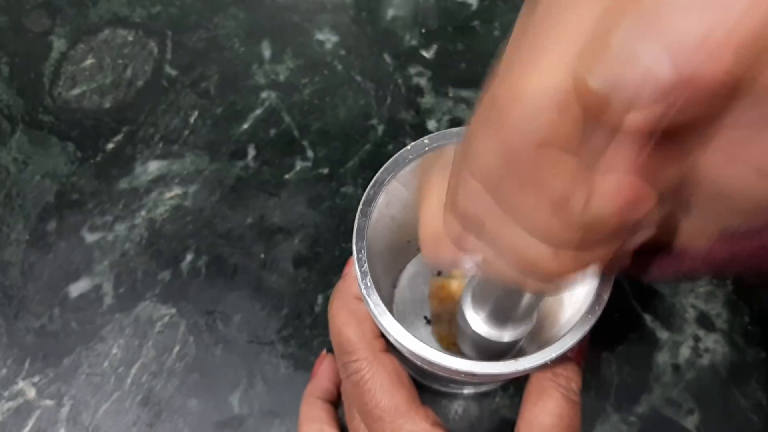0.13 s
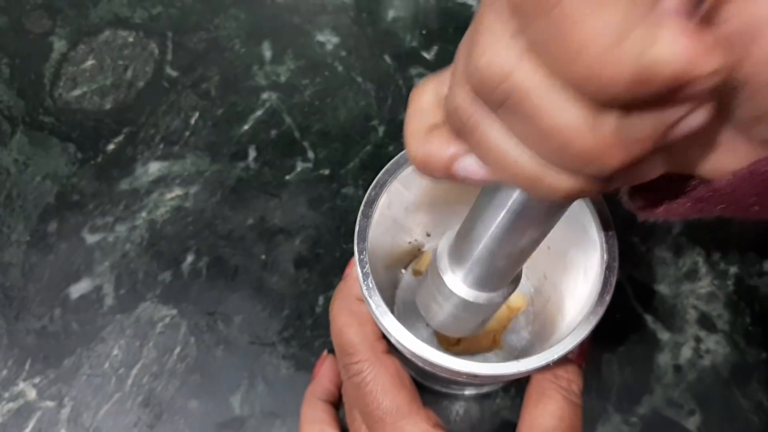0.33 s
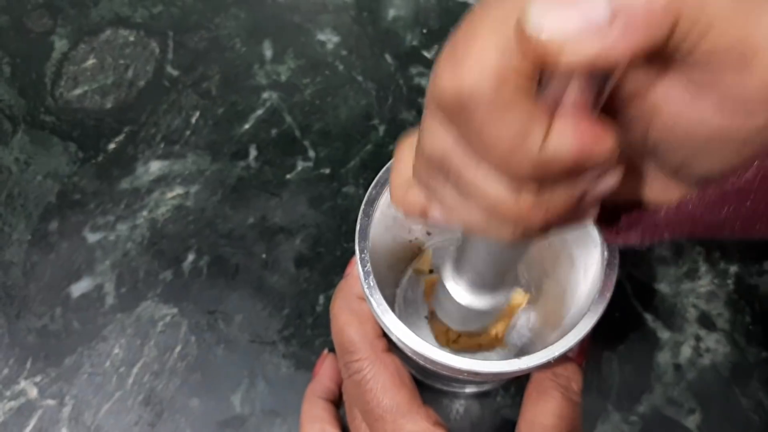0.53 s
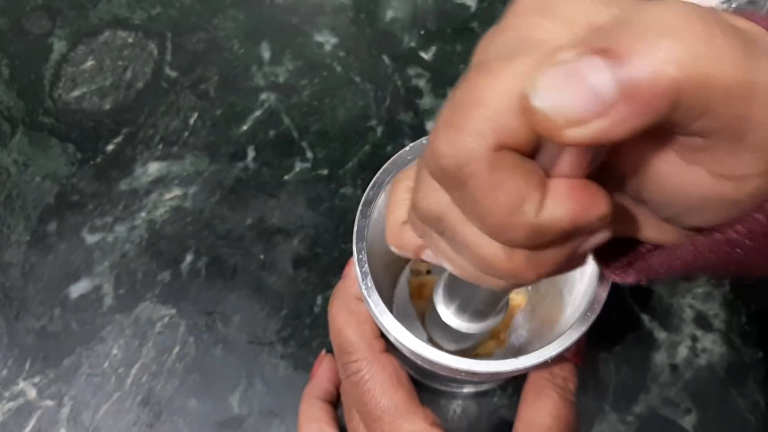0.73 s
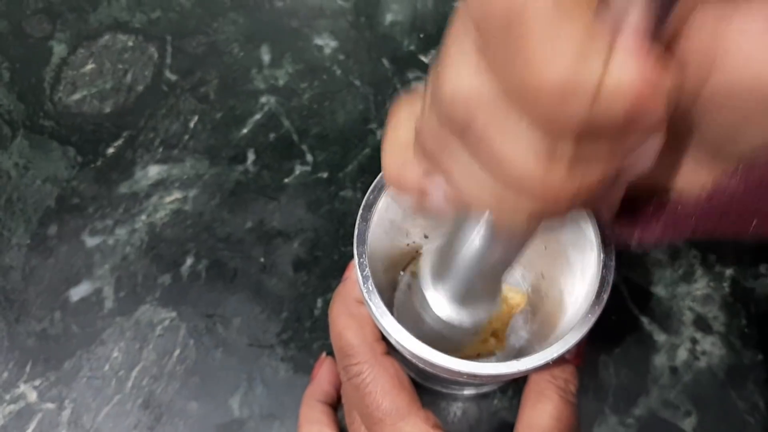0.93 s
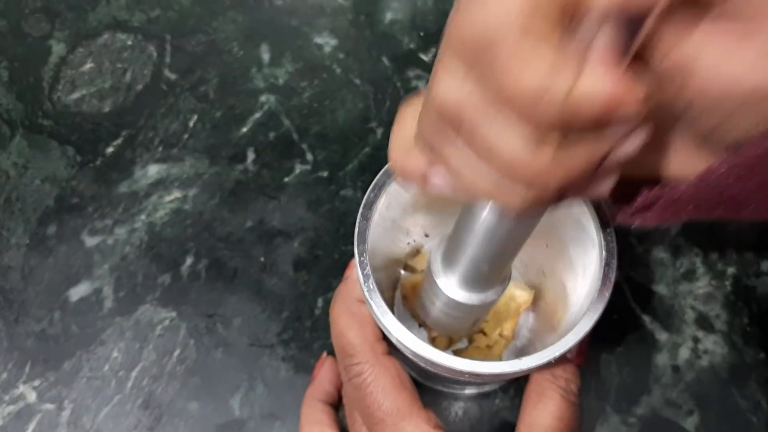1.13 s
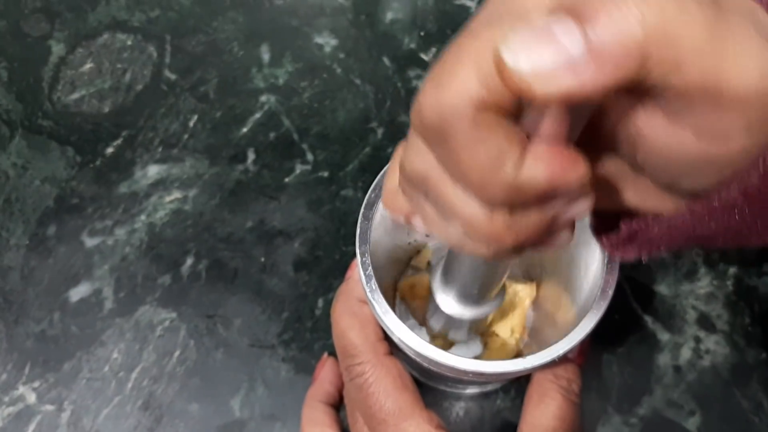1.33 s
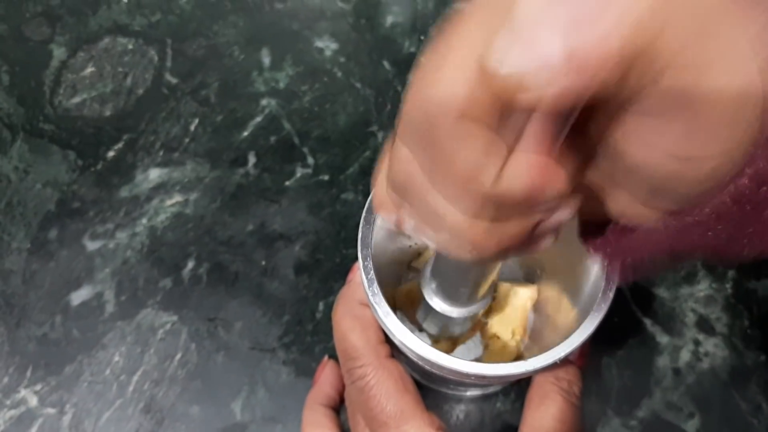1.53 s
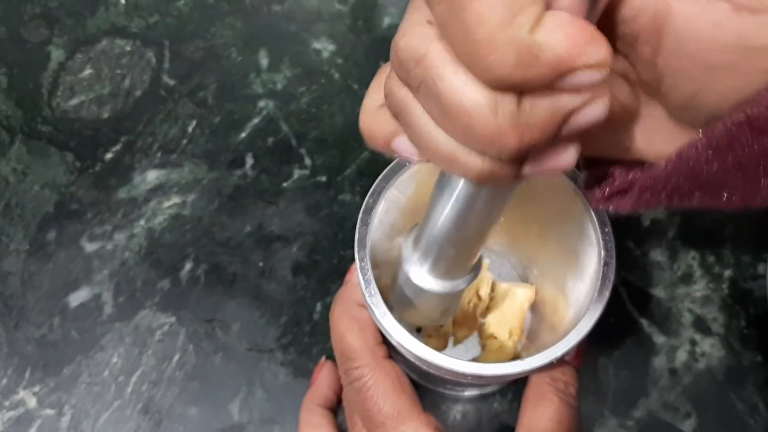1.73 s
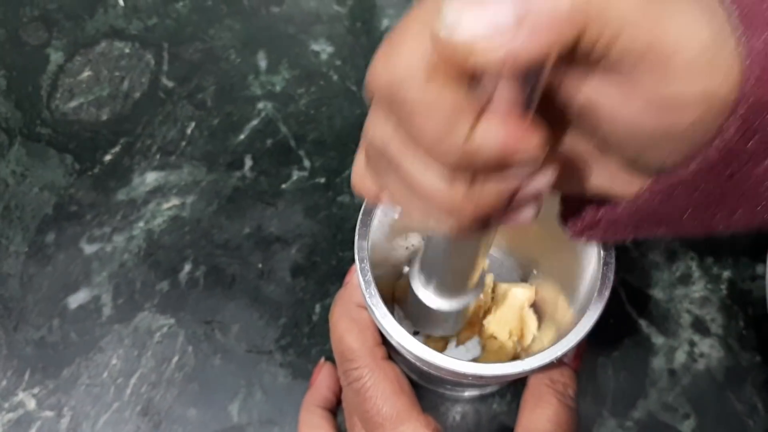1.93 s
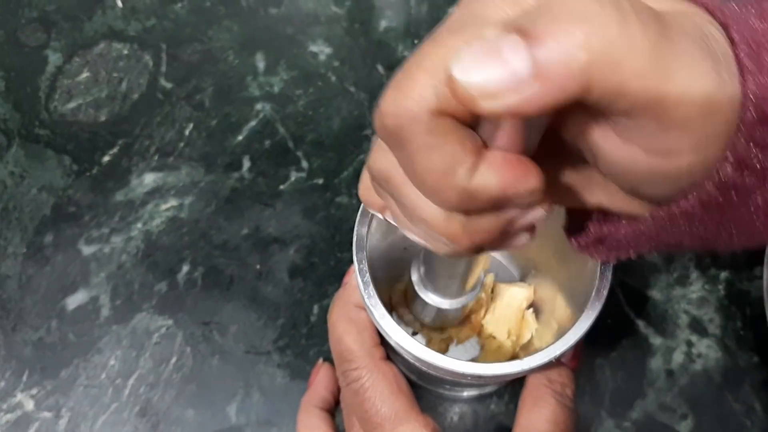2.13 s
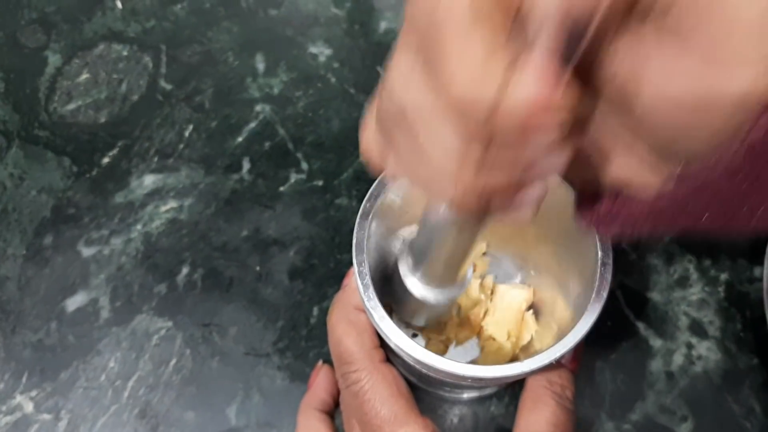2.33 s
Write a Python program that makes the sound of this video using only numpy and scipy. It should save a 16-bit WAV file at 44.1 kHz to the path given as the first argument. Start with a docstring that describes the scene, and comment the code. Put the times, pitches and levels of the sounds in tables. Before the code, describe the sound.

Steady pounding of ginger in a steel mortar, crunchy thuds ending in two ringing clinks.

```python
"""Pounding ginger in a steel mortar

A steel pestle pounds fresh ginger in a hand-held steel mortar on a stone kitchen counter, about 3.6
blows a second, over room air and an appliance hum. Each blow crushes the root with a short wet crunch
and thumps the counter, which booms in the small room. At the end the rising pestle clips the bare
wall of the mortar twice and the metal rings."""
import sys
import numpy as np
from scipy import signal
from scipy.fft import rfft, irfft, next_fast_len
from scipy.io import wavfile
from scipy.ndimage import uniform_filter1d, map_coordinates

SR = 44100
rng = np.random.default_rng(int(sys.argv[2]) if len(sys.argv) > 2 else 0)


def digitize_waveform(pressure):
    """Quantize a signal to 16-bit integers and store it at the path in sys.argv[1].

    Rows of a 2-D input are taken as channels; values are limited to [-1, 1].
    """
    field = np.atleast_2d(pressure).T
    bounded = np.clip(field, -1, 1)
    quanta = np.round(bounded * 32767).astype(np.int16)
    wavfile.write(sys.argv[1], SR, quanta)


N = 104958
LEAD = SR // 4  # samples before time zero


def amp(db):
    """Decibels to gain."""
    return 10 ** (np.asarray(db) / 20)


def unit(x):
    """Scale to rms 1."""
    return x / np.sqrt(np.mean(x ** 2) + 1e-20)


def along(points, hz):
    """Read (Hz, value) points on a log axis."""
    freqs, values = np.transpose(points)
    return np.interp(np.log(hz + 1), np.log(freqs + 1), values)


def bump(hz, centre_hz, width_oct):
    """Bell curve on a log-frequency axis."""
    return np.exp(-(np.log2((hz + 1) / centre_hz) / width_oct) ** 2 / 2)


def wobble(knots_per_s):
    """Smooth random curve."""
    position = np.arange(N + LEAD) * knots_per_s / SR
    return map_coordinates(rng.standard_normal(1024), [position], mode="mirror")


def filtered(x, response):
    """Apply a gain given as a function of Hz."""
    n = x.shape[-1]
    size = next_fast_len(n + 4096)
    return irfft(rfft(x, size) * response(np.fft.rfftfreq(size, 1 / SR)), size)[..., :n]


def add(track, sound, start_s):
    """Mix a sound into a track."""
    start = max(round(start_s * SR) + LEAD, 0)
    part = track[:, start:start + sound.shape[-1]]
    part += sound[..., :part.shape[-1]]


# Likeness of left and right. Each row: frequency in Hz, correlation.
COHERENCE = [(100, 0.82), (400, 0.91), (700, 0.2), (1200, 0.056), (3000, 0.13), (5000, 0.12), (15000, 0.04)]
def noise(spectrum, size, colour_db=lambda hz: 0):
    """Stereo noise, nearly mono in the bass; rms 1 before the colour."""
    def mid_side_gain(hz):
        angle = np.arccos(np.clip(along(COHERENCE, hz), -1, 1)) / 2
        return amp(along(spectrum, hz)) * [np.cos(angle), np.sin(angle)]
    mid, side = filtered(rng.standard_normal((2, size)), mid_side_gain)
    return filtered(unit(np.array([mid + side, mid - side])), lambda hz: amp(colour_db(hz)))


def burst(peak_s, spectrum, rise_s, fall_s, hold_s=0, colour_db=lambda hz: 0, grain_db=0):
    """Puff of noise, optionally grainy, that swells up to peak_s, holds and dies."""
    t = np.arange(SR // 8) / SR - .01
    envelope = np.exp(np.minimum(t, 0) / rise_s - np.maximum(t - hold_s, 0) / fall_s)
    roughness = unit(uniform_filter1d(rng.standard_normal(len(t)), size=32))
    grains = unit(amp(grain_db * roughness))
    track = np.zeros((2, N + LEAD))
    add(track, noise(spectrum, len(t), colour_db) * envelope * grains, peak_s + t[0])
    return track


def ring(modes, weight_db, right_lag_s=.00022):
    """Struck modes bloom and decay, left ear first; each contact weights them a little differently."""
    t = np.maximum(np.arange(int(.7 * SR)) / SR - np.array([[0], [right_lag_s]]), 0)
    vary_db = rng.normal(0, 1, len(modes))
    sound = 0
    for k, (hz, db, t60_s, rise_s) in enumerate(modes):
        decay = amp(db + vary_db[k] + weight_db(hz) - 60 * t / t60_s)
        bloom = 1 - np.exp(-(t / rise_s) ** 2.5)
        sound += (-1) ** k * decay * bloom * np.sin(2 * np.pi * hz * t)
    return sound


# Kitchen decay. Each row: frequency in Hz, T60 in seconds.
KITCHEN_T60 = [(100, 0.38), (400, 0.57), (1000, 0.66), (3000, 0.57), (8000, 0.33), (15000, 0.3)]
def room(x, tail_db=-13, early_db=-12.5, early_t60_s=.11):
    """Near tiles answer at once; the kitchen's tail dies faster in the treble."""
    t = np.arange(SR // 2) / SR
    white = lambda: noise([(20, 0), (20000, 0)], len(t))
    hz, frame_s, bands = signal.stft(white(), SR, nperseg=256)
    decay = amp(-60 * frame_s / along(KITCHEN_T60, hz)[:, None])
    tail = signal.istft(bands * decay, SR, nperseg=256)[1][:, :len(t)]
    early = white() * amp(-60 * t / early_t60_s)
    response = sum(amp(db) * part * (t > .002) / np.linalg.norm(part[0])
                   for db, part in [(tail_db, tail), (early_db, early)])
    return x + signal.fftconvolve(x, response, axes=1)[:, :x.shape[1]]


# Room air. Each row: frequency in Hz, relative level in dB.
AIR_SPECTRUM = [(15, -46), (25, -34), (73, -10), (122, 0.5), (152, -8.5), (193, -8), (433, -21.5),
                (997, -39.5), (1170, -43), (2490, -36), (6050, -35.5), (7100, -33.5), (15500, -40)]
def room_air(level_db=-47.5):
    """Steady, mostly low rush of the room."""
    return amp(level_db) * noise(AIR_SPECTRUM, N + LEAD)


def appliance_hum(hz=129.4, rms_db=-51.5):
    """Low tone with a slightly unsteady phase."""
    t = (np.arange(N + LEAD) - LEAD) / SR
    phase = 2 * np.pi * hz * t + .39 * wobble(knots_per_s=6.06)
    return amp(rms_db) * np.sqrt(2) * np.sin(phase)


# Pestle blows. Each row: time in seconds; thump, hollow-note boost, knock, boxy boost, crunch,
# low-treble boost and top-treble boost, all in dB; squeak in Hz; steel ring in dB.
PESTLE_BLOWS = [(-.085, -29, -10, -26.5, -3.5, -23, -1, 3, 7200, -42.5),
                (0.1931, -28.5, -7, -28, 0.5, -25, 3.5, 0.5, 7870, -51),
                (.4742, -29, -1.5, -29.5, 5, -21, -2, -1.5, 3720, -38.5),
                (0.7544, -27.5, -9, -33, 5, -23.5, -2, 0, 7640, -74),
                (1.0320, -30, -5, -29.5, -8.5, -21.5, -6.5, 0.5, 6000, -44),
                (1.3104, -29, 2, -29.5, -2.5, -22.5, -1.5, 5, 13300, -47.5),
                (1.5895, -28.5, 10.5, -30.5, 1, -26, 1.5, 5, 2660, -48.5),
                (1.8600, -31, 12.5, -30.5, -2.5, -25, -2, -1.5, 7520, -57),
                (2.1383, -29.5, 12, -25.5, -9, -21, 2.5, -1, 7160, -57)]
# Bursting fibres. Each row: frequency in Hz, relative level in dB.
CRUNCH_SPECTRUM = [(300, -10), (900, -7.5), (1250, -14), (2100, -16), (2600, -0.5), (3500, -0.5),
                   (4300, -3), (5300, 2), (6400, -4), (7400, 2.5), (8700, -7.5), (10500, -5), (15500, -10)]
# Brief, brightest crack at the height of the crunch. Each row: frequency in Hz, relative level in dB.
SNAP_SPECTRUM = [(2000, -52), (5000, -16), (10000, 8), (15500, 4)]
def ginger_crunch(squeak_db=7.5, snap_boost_db=6):
    """Wet fibres burst and squeak against the steel; a brief bright snap cracks at the height of each crunch as
    the root gives way."""
    track = 0
    for at_s, *_, crunch_db, low_db, top_db, squeak_hz, _ in PESTLE_BLOWS:
        treble = [(1500, 0), (2600, low_db), (3900, low_db), (5000, 0), (8000, 0), (11000, top_db)]
        colour = lambda hz: along(treble, hz) + squeak_db * bump(hz, squeak_hz, width_oct=.054)
        crunch = burst(at_s, CRUNCH_SPECTRUM, rise_s=.00066, fall_s=.0044, hold_s=.0028,
                       colour_db=colour, grain_db=2)
        snap = burst(at_s + .0012, SNAP_SPECTRUM, rise_s=.0003, fall_s=.0003, colour_db=colour)
        track += amp(crunch_db) * (room(crunch) + amp(snap_boost_db) * snap)
    return track


# Counter and kitchen modes. Each row: frequency in Hz, level in dB, T60 and build-up in seconds.
COUNTER_MODES = [(73, -3.5, 0.48, 0.018), (95.6, -1, 0.58, 0.01), (126.66, -8, 0.71, 0.03),
                 (146.6, -7.5, 0.59, 0.012), (195.6, -8, 0.21, 0.006), (224.4, -9.5, 0.19, 0.009),
                 (250.7, -10.5, 0.28, 0.0073), (294.5, -9, 0.33, 0.0068), (316.5, -5, 0.22, 0.0045)]
# Modes of the mortar on the slab. Each row: frequency in Hz, level in dB, T60 and build-up in seconds.
FOOT_MODES = [(403.2, -10, 0.35, 0.012), (439.7, -7, 0.29, .003), (486.5, -4, 0.13, 0.001),
              (540.3, -5.5, 0.078, 0.002), (634, -8.5, 0.17, 0.0019), (849, -20.5, 0.15, 0.001),
              (872, -15, 0.19, 0.0081), (928, -10, 0.2, 0.028), (1028, -22, 0.34, 0.018)]
# Foot hitting stone. Each row: frequency in Hz, relative level in dB.
KNOCK_SPECTRUM = [(40, -28), (80, -2), (200, -3.5), (500, -4), (720, -9), (1050, -14.5), (1200, -22.5),
                  (2500, -23.5)]
def counter_thump(echo_s=.0306, echo_db=-.5, echo_cut_db=21):
    """The mortar's foot knocks on the slab, low modes boom, a far wall returns mostly the hollow note."""
    boom, knocks = np.zeros((2, N + LEAD)), 0
    for at_s, thump_db, hollow_db, knock_db, boxy_db, *_ in PESTLE_BLOWS:
        # The hollow note grows as the root flattens and the pestle reaches the bottom.
        hollow = lambda hz: hollow_db * bump(hz, centre_hz=207.7, width_oct=.23)
        returned = lambda hz: hollow(hz) + echo_cut_db * (bump(hz, centre_hz=206, width_oct=.22) - 1)
        boxy = lambda hz: boxy_db * bump(hz, centre_hz=944, width_oct=.19)
        add(boom, amp(thump_db) * ring(COUNTER_MODES, hollow), at_s)
        add(boom, amp(knock_db) * ring(FOOT_MODES, boxy), at_s)
        add(boom, amp(thump_db + echo_db) * ring(COUNTER_MODES, returned), at_s + echo_s)
        knock = burst(at_s, KNOCK_SPECTRUM, rise_s=.00085, fall_s=.014, colour_db=boxy)
        knocks += amp(knock_db - 4) * knock
    return boom + room(knocks, tail_db=.5)


# Modes of the steel. Each row: frequency in Hz, level in dB, T60 and build-up in seconds.
STEEL_MODES = [(2523, 0, .21, .006), (2556, -13, .12, .005), (2853, -7, .07, .001), (3170, -19, .05, .001),
               (3680, -13, .04, .001), (4830, -22, .07, .001), (6430, -12, .07, .001),
               (6520, -7, .06, .001), (7450, -19, .09, .001), (7570, -15, .06, .001),
               (9577, -10, .08, .001), (10930, -12, .09, .002), (11860, -31, .15, .002)]
def steel_ring(tilt_db_per_oct):
    """One ring of the struck steel, its spectrum tilted about the lowest mode."""
    tilt = lambda hz: tilt_db_per_oct * np.log2(hz / STEEL_MODES[0][0])
    return ring(STEEL_MODES, tilt, right_lag_s=.00005)


# Pestle on bare steel. Each row: time in seconds, ring in dB, tick in dB, tilt in dB per octave.
BARE_CLINKS = [(2.2972, -16.5, -21, 3), (2.3204, -13.5, -23, -12)]
# Contact tick. Each row: frequency in Hz, relative level in dB.
TICK_SPECTRUM = [(300, -24), (1900, -19), (2800, 2), (3800, -13), (5000, -19), (5900, -29), (7600, -25),
                 (8400, -39), (15000, -45)]
def steel_contacts(flutter_db=3):
    """Cushioned blows ring the steel faintly; bare contacts tick and ring it loudly. The ring wavers."""
    rings, ticks = np.zeros((2, N + LEAD)), 0
    for at_s, *_, ring_db in PESTLE_BLOWS:
        add(rings, amp(ring_db) * steel_ring(tilt_db_per_oct=-72), at_s)
    for at_s, ring_db, tick_db, tilt_db_per_oct in BARE_CLINKS:
        add(rings, amp(ring_db) * steel_ring(tilt_db_per_oct), at_s)
        ticks += amp(tick_db) * burst(at_s, TICK_SPECTRUM, rise_s=.0006, fall_s=.0073, hold_s=.0029)
    rings *= amp(flutter_db * wobble(knots_per_s=70))
    return room(rings, tail_db=-17, early_db=-24.5) + room(ticks)


def scene():
    """Stereo mix; the pounding is already under way at time zero."""
    pounding = ginger_crunch() + counter_thump() + steel_contacts()
    return (pounding + room_air() + appliance_hum())[:, LEAD:]


def record(dry):
    """The microphone thins the deep bass and cuts off the highest treble."""
    low_cut_hz, top_hz = 27, 15750
    thinned = signal.sosfilt(signal.butter(2, low_cut_hz, "high", fs=SR, output="sos"), dry)
    return filtered(thinned, lambda hz: 1 / np.sqrt(1 + (hz / top_hz) ** 160))


dry = scene()
out = record(dry)
digitize_waveform(out)
```